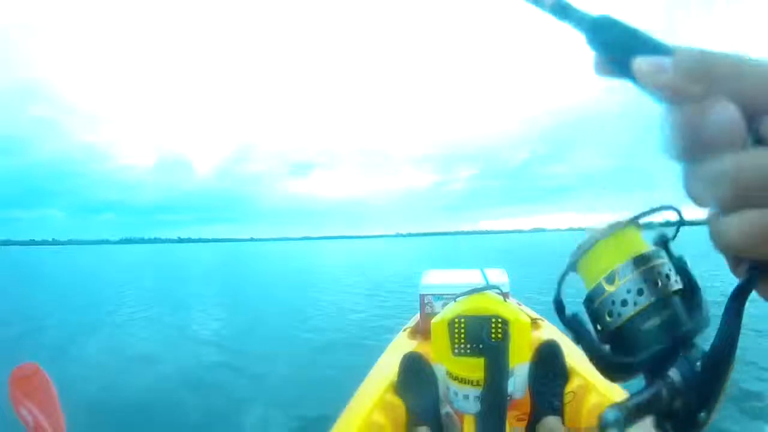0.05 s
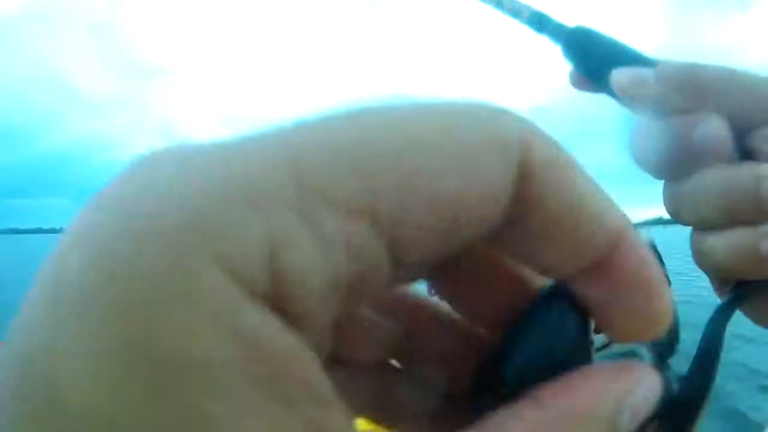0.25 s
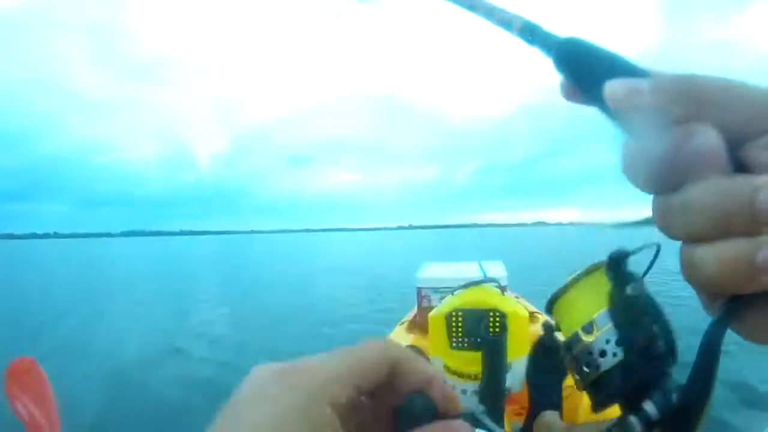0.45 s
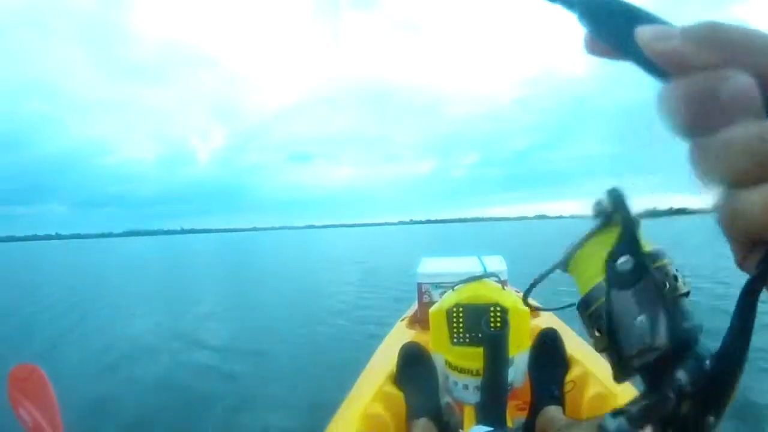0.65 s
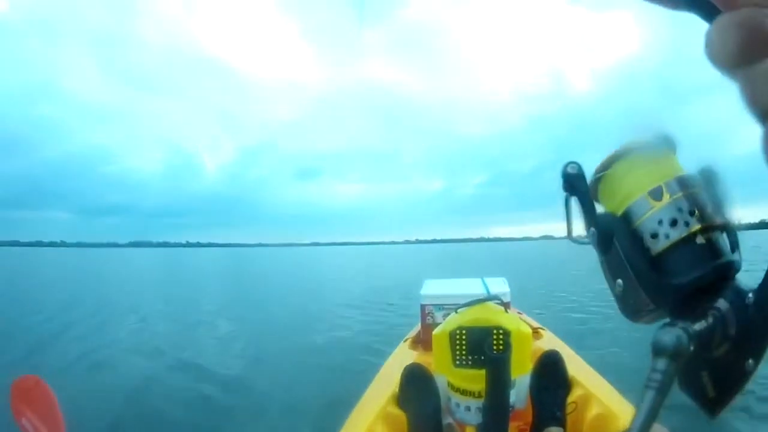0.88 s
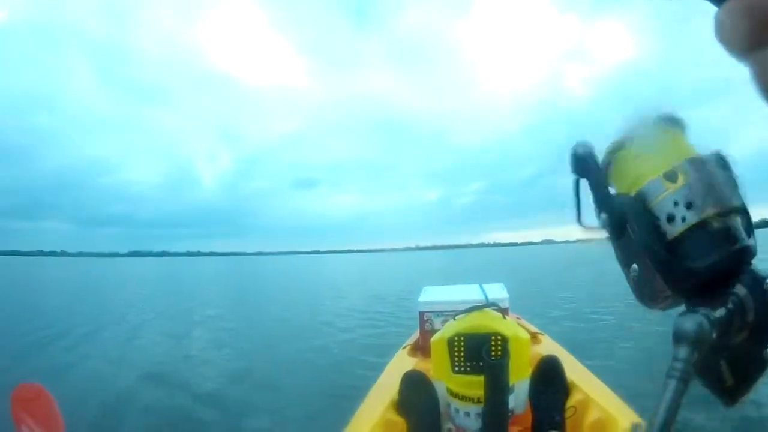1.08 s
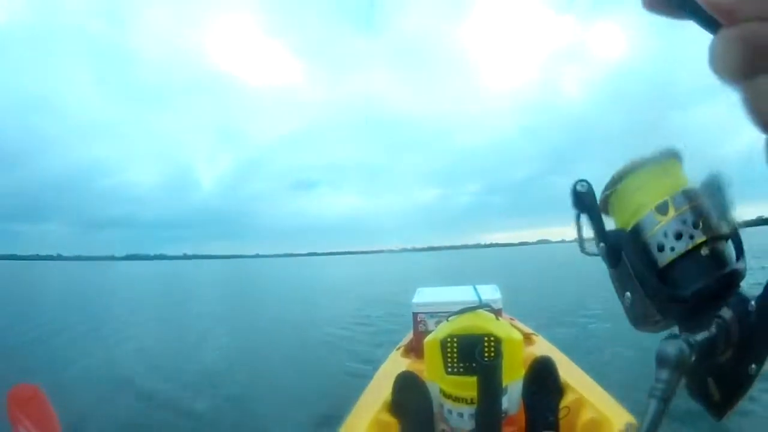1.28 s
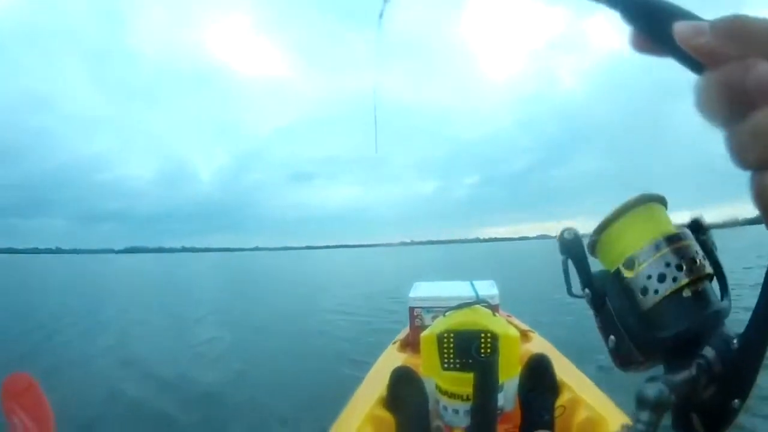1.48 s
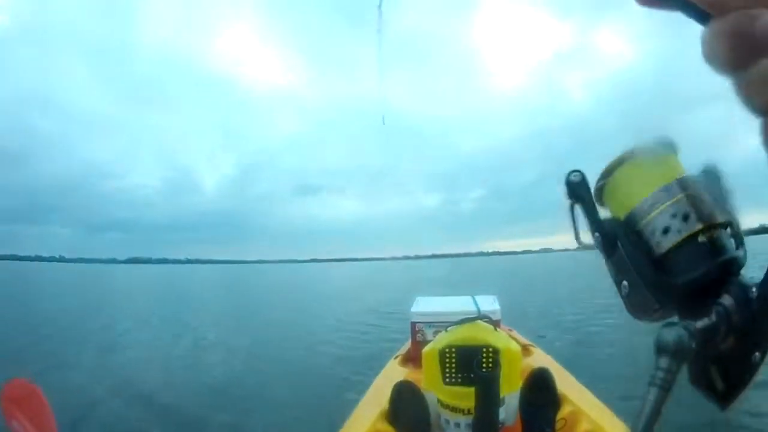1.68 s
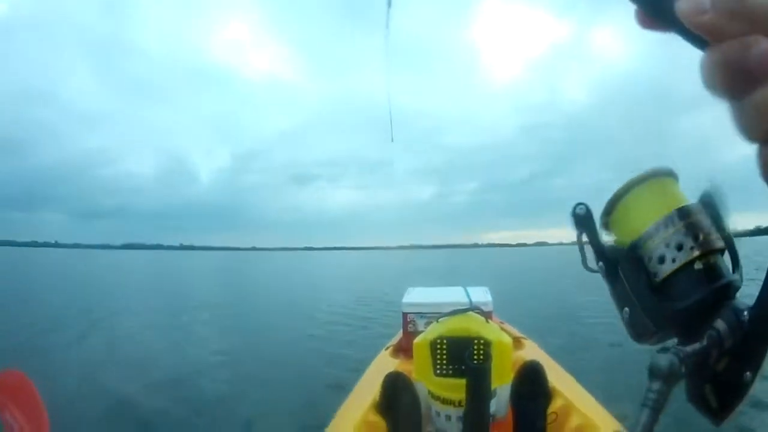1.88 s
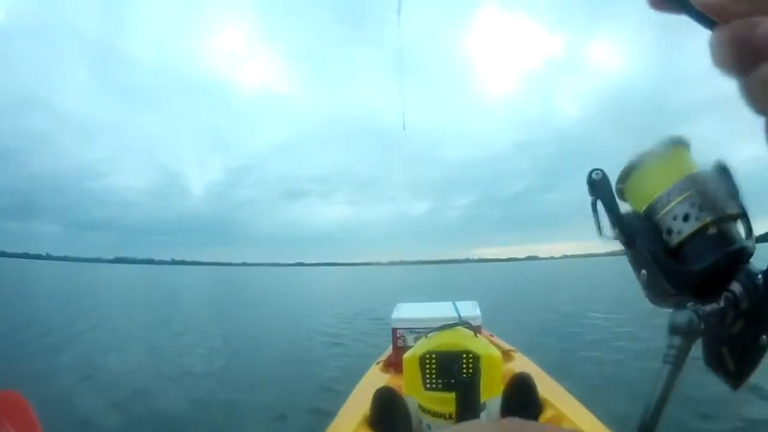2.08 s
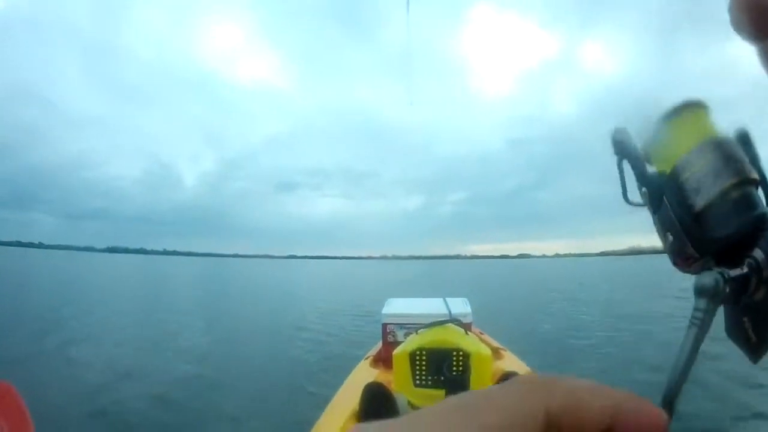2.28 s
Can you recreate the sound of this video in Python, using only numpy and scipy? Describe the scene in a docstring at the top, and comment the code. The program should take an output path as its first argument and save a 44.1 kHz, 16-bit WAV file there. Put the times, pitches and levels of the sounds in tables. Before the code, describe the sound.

A fishing reel whirs faintly after a hand bumps the microphone housing. Then its drag clicks into a rasping buzz as line pulls out, while gear knocks sharply three times. Close up, over a low rumble on open water.

```python
"""First a hand bumps and scrapes a small camera's plastic housing, on a fishing kayak in calm water.
The reel's gears whir faintly and the hull thuds softly, over a low rumble and the hiss of open air.
Then line is pulled off the spool: a small catch (the pawl) clicks on each passing tooth, speeding
up to a buzz, and the line rasps. Fishing gear knocks three times and makes the housing ring."""
import sys
import numpy as np
from scipy import signal
from scipy.fft import rfft, irfft, next_fast_len
from scipy.io import wavfile
from scipy.ndimage import uniform_filter1d, minimum_filter1d, map_coordinates

SR = 44100
rng = np.random.default_rng(int(sys.argv[2]) if len(sys.argv) > 2 else 0)


def file_out(sig):
    """Save sig as 16-bit WAV at sys.argv[1]."""
    # one column per channel
    cols = np.atleast_2d(sig).T
    # limit, then scale
    lim = np.clip(cols, -1, 1)
    pcm = np.round(lim * 32767).astype(np.int16)
    wavfile.write(sys.argv[1], SR, pcm)


N = 108045

# the tones the housing rings with: pitch_hz, level_db, fade_s (time to fall by 60 dB)
HOUSING_TONES = [(500, -24, 0.03), (776, -10, .022), (1091, 1.5, 0.026), (1334, -7, 0.023),
                 (1537, -5, 0.025), (1693, -9, 0.029), (2059, -6, 0.025), (2400, -24.5, 0.025),
                 (2775, -20.5, .014), (3643, -14, 0.018), (8370, -24.5, 0.025), (9980, -17.5, 0.025),
                 (10480, -19.5, 0.024), (10915, -16.5, 0.023), (12800, -18, 0.025), (13900, -16, 0.026)]
HOUSING_ATTACK_S = 0.0009


def reel_drag():
    """The pawl clicks once per tooth of the slipping spool; faster line rasps louder."""
    # how fast the spool turns: time_s, clicks_per_s
    spool_speed = [(1.558, 52), (1.58, 90), (1.61, 190), (1.64, 305), (1.71, 373.8), (1.81, 230),
                   (1.845, 125), (1.866, 84), (1.893, 64), (1.925, 125), (2.0, 230), (2.08, 335),
                   (2.13, 260), (2.2, 310), (2.38, 240), (2.45, 170)]
    # how hard the pawl strikes: time_s, level_db
    pawl_force = [(1.558, -35), (1.578, -36), (1.608, -60), (1.635, -29), (1.68, -33.5), (1.71, -34.5),
                  (1.775, -34), (1.81, -28.5), (1.825, -41), (1.86, -34), (1.885, -47), (1.9, -33.5),
                  (1.92, -34.5), (1.94, -37.5), (2.05, -33.5), (2.15, -37.5), (2.25, -35.5), (2.37, -37),
                  (2.45, -40)]
    # the tones the pawl rings with: pitch_hz, level_db, fade_s
    pawl_tones = [(4665, -0.5, 0.0093), (5470, -15, 0.011), (6520, -16.5, 0.0058), (7310, -3.5, 0.0089)]
    # the noisy snap in each click: pitch_hz, level_db
    snap_colour = [(2500, -43), (4300, 4), (7500, -0.5), (9000, -45)]
    # the rasp of running line: pitch_hz, level_db
    line_colour = [(500, -21), (850, -22), (1100, -9), (1400, -13.5), (1600, -9.5), (1780, 7.5),
                   (2050, -10.5), (2600, -8), (2950, -14.5), (3130, 1.5), (3450, -10), (3900, -5),
                   (4700, -8), (5500, -13), (6000, -40), (6500, -8.5), (7300, -16), (8100, -10.5),
                   (8900, -13), (9500, -20.5), (10200, -12), (11000, -53), (12900, -54), (13750, -11),
                   (14400, -31), (15150, -12.5), (15600, -58)]
    t, out, speed = clock(), np.zeros(N), curve(spool_speed)
    start_s, start_speed = spool_speed[0]
    slipping = t >= start_s
    teeth_passed = np.ceil(np.cumsum(speed * slipping) / SR)
    tug_db = 2.47 * wobble(45)
    force_db = curve(pawl_force) + tug_db
    for i in np.flatnonzero(np.diff(teeth_passed)):
        snap_db = -7 - 4.5 * np.log2(speed[i] / start_speed)  # softer as the spool speeds up
        snap = amp(snap_db) * burst(snap_colour, fade_s=0.0062, size=1024)
        click = ring(pawl_tones, attack_s=0.00099, scatter_db=2.5, size=1024) + snap
        click_s = t[i] + 0.0006 * rng.normal()
        click_db = force_db[i] + rng.normal()
        add(out, click_s, amp(click_db) * click)
    rasp = unit(amp(wobble(400)) * noise(line_colour))
    rasp_db = -47.5 + 4 * np.log2(speed / 372) + tug_db  # 4 dB louder at twice the speed
    return out + slipping * amp(rasp_db) * rasp


def gear_knocks():
    """Each knock rings the housing, rocks the camera's mount and bounces once."""
    # hard knocks: start_s, level_db, thump_db, bounce_after_s, bounce_db (relative to the knock)
    knocks = [(1.9512, -7, -14.5, .0120, -7.5), (2.0775, -14, -20, .0130, -11),
              (2.1760, -14.5, -17, 0.00431, -9)]
    out, thump_delay_s = np.zeros(N), 0.0036
    for start_s, level_db, thump_db, bounce_after_s, bounce_db in knocks:
        thump = ring([(141.7, thump_db, 0.024)], attack_s=0.00032)
        add(out, start_s, amp(level_db) * housing_hit())
        add(out, start_s + thump_delay_s, thump)
        add(out, start_s + bounce_after_s, amp(level_db + bounce_db) * housing_hit())
    return out


def housing_hit():
    """One hard hit on the plastic: ringing tones and a short low thud."""
    # the thud: pitch_hz, level_db
    thud_colour = [(200, 87), (500, -7), (1000, -12), (2200, -28), (3000, 48), (3700, -9), (4500, -19),
                   (7500, -41), (10500, -11), (11200, -29), (12000, -39), (13000, -13), (13800, -57),
                   (15000, -41)]
    ringing = ring(HOUSING_TONES, HOUSING_ATTACK_S, scatter_db=-0.44)
    return ringing + amp(-10.5) * burst(thud_colour, fade_s=0.033)


def hand_taps():
    """A soft touch gives a muffled ring, a short low push and a faint bright tick."""
    # taps on the housing: start_s, level_db, push_db, cutoff_hz, tick_db
    taps = [(0.21, -29, -28, 3040, -45), (0.2188, -28, -29, 4000, -41), (0.319, -44.5, -42, 3040, -60.5),
            (1.5067, -36.5, -24, 630, -60)]
    # the tick: pitch_hz, level_db
    tick_colour = [(7000, -36), (9500, -9), (11000, -4), (13500, -6), (15000, -16)]
    out = np.zeros(N)
    for start_s, level_db, push_db, cutoff_hz, tick_db in taps:
        muffle = signal.butter(2, cutoff_hz, fs=SR, output="sos")
        dull_ring = signal.sosfilt(muffle, housing_hit())
        push = ring([(212, push_db, 0.018)], attack_s=0.00024)
        tick = amp(tick_db) * burst(tick_colour, fade_s=0.041)
        add(out, start_s, amp(level_db) * dull_ring + push + tick)
    return out


def hand_scrape():
    """The hand rubs over the housing in tiny quick slips, and each slip makes it ring."""
    # the rubbing noise: pitch_hz, level_db
    rub_colour = [(180, -5), (300, -5), (541, -17.5), (714, -8), (991, -11), (1130, 2.5), (1440, -34),
                  (1700, -6), (2320, -18.5), (2780, -31.5), (3730, -13.5), (4180, -29), (4930, -27),
                  (6200, -41), (8190, -24), (9180, -44), (10600, -20), (12100, -53), (12700, -42),
                  (13600, -36), (15000, -61)]
    peak_s, rise_s, fall_s, slips_per_s = 0.2319, 0.0044, 0.01, 1560
    t = clock() - peak_s
    stroke = swell(t, np.where(t < 0, rise_s, fall_s))
    slips = (rng.random(N) < slips_per_s / SR) * rng.choice([-1, 1], N) * stroke
    ringing = signal.fftconvolve(slips, ring(HOUSING_TONES, HOUSING_ATTACK_S))[:N]
    ringing = unit(ringing) * np.sqrt(np.mean(stroke ** 2))  # as strong as the stroke
    rub = swell(t - 0.003, half_s=0.0097) * noise(rub_colour)
    return amp(-24) * ringing + amp(-24.5) * rub


def hull_thuds():
    """Dull thuds pass through hand, seat and hull: brief low swells that do not ring."""
    # thuds: peak_s, pitch_hz, level_db, half_length_s
    thuds = [(0.2256, 45, -5.5, 0.01), (.2205, 116, -13.5, 0.004), (.33, 148, -54.5, 0.019),
             (0.826, 80, -44.5, 0.017), (.965, 31, -36, 0.032), (1.321, 88, -46, .016),
             (1.642, 184, -40, 0.0054)]
    t = clock()
    return sum(amp(db) * swell(t - peak_s, half_s) * np.cos(2 * np.pi * hz * (t - peak_s))
               for peak_s, hz, db, half_s in thuds)


def reel_whir():
    """The reel's gears rub quietly, with a fine grain and a tone that keeps shifting."""
    # how loud the reel is as it is handled: time_s, level_db
    whir_level = [(.1, -62), (.2, -68.5), (.3, -61), (.45, -59.5), (.54, -61), (.59, -62.5), (.63, -59.5),
                  (.68, -58.5), (.745, -61), (.79, -92), (.83, -78), (.85, -61), (.88, -70.5), (1.12, -85),
                  (1.165, -65), (1.21, -87), (1.237, -62), (1.27, -80), (1.5, -69)]
    # the rubbing gears: pitch_hz, level_db
    whir_colour = [(600, -16.5), (800, -2), (950, -15.5), (1090, 2.5), (1350, -10), (1620, -4), (1800, 8),
                   (1950, -3), (2100, 4.5), (2320, -4), (2750, -13), (3700, -8), (4100, -12.5), (4550, -5),
                   (5100, -21), (5600, -15), (6000, -40), (6500, -23), (7400, -12), (8750, -19.5),
                   (10100, -11.5), (11600, -42), (14000, -12.5), (15000, -30)]
    grain_db, patch_db = 2.5, 4
    grainy = amp(grain_db * wobble(250)) * rng.standard_normal(N)
    spectrum = signal.stft(grainy, nperseg=512)[2]
    # random patches of pitch and time get louder or softer
    patches = uniform_filter1d(rng.standard_normal(spectrum.shape), size=4, axis=0)
    patches = uniform_filter1d(patches, size=9, axis=1)
    patchy = signal.istft(spectrum * amp(patch_db * unit(patches)), nperseg=512)[1][:N]
    return amp(curve(whir_level)) * coloured(patchy, whir_colour)


def water_and_air():
    """Water and hull rumble under the steady hiss of open air."""
    # how loud the rumble is: time_s, level_db
    rumble_level = [(.1, -59.5), (.3, -52), (.55, -50.5), (.75, -55), (1.05, -53.5), (1.45, -53.5),
                    (1.62, -50), (2.1, -47), (2.3, -49), (2.45, -58)]
    # the rumble: pitch_hz, level_db
    rumble_colour = [(20, 2), (45, -9), (100, -8.5), (240, -16.5), (320, -23), (600, -37), (1500, -63)]
    # the hiss: pitch_hz, level_db
    air_colour = [(300, 9), (600, 3), (2100, -5), (3000, -5.5), (5400, -11.5), (6000, -29), (6600, -12.5),
                  (10300, -16.5), (11200, -19.5), (13000, -29), (14000, -17), (14500, -39)]
    rumble = amp(curve(rumble_level) + wobble(23)) * noise(rumble_colour)
    return rumble + amp(-65.5) * noise(air_colour)


def amp(db):
    """Turn decibels into a number to multiply by."""
    return 10 ** (np.asarray(db) / 20)


def unit(x):
    """Scale a signal to an average strength (rms) of 1."""
    return x / np.sqrt(np.mean(x ** 2) + 1e-20)


def clock():
    """The time of every sample, in seconds."""
    return np.arange(N) / SR


def curve(rows):
    """Join (time_s, value) points with straight lines."""
    return np.interp(clock(), *np.transpose(rows))


def swell(t, half_s):
    """A smooth rise and fall that peaks at t = 0."""
    return np.exp(-(t / half_s) ** 2)


def wobble(points_per_s):
    """A smooth curve through random points."""
    return map_coordinates(rng.standard_normal(N // 8), [clock() * points_per_s + 2], mode="wrap")


def coloured(x, colour):
    """Give x a colour (how loud each pitch is), at strength 1."""
    size = next_fast_len(len(x) + 8192)
    hz, db = np.transpose(colour)
    gain = amp(np.interp(np.log(np.fft.rfftfreq(size, 1 / SR) + 1), np.log(hz + 1), db))
    return unit(irfft(rfft(x, size) * gain, size)[:len(x)])


def noise(colour, size=N):
    """Coloured noise of strength 1."""
    return coloured(rng.standard_normal(size), colour)


def burst(colour, fade_s, size=4096, attack_s=0.00039):
    """A puff of noise that dies away."""
    t = np.arange(size) / SR
    return amp(-60 * t / fade_s) * (1 - np.exp(-t / attack_s)) * noise(colour, size)


def ring(tones, attack_s, scatter_db=0, size=4096):
    """Tones that fade after one hit; neighbours start in opposite directions."""
    t, out = np.arange(size) / SR, np.zeros(size)
    for k, (pitch_hz, level_db, fade_s) in enumerate(tones):
        fade = amp(level_db + scatter_db * rng.normal() - 60 * t / fade_s)
        out += (-1) ** k * fade * np.sin(2 * np.pi * pitch_hz * t)
    return out * (1 - np.exp(-t / attack_s))


def add(track, start_s, sound):
    """Mix a sound into the track."""
    part = track[max(round(start_s * SR), 0):][:len(sound)]
    part += sound[:len(part)]


def scene():
    """Everything reaches one microphone, with no echo over open water."""
    bumps = gear_knocks() + hand_taps() + hand_scrape() + hull_thuds()
    return (bumps + reel_drag() + reel_whir() + water_and_air())[None]


def record(dry):
    """After a moment of silence, the camera turns down loud peaks and cuts the highest treble."""
    start_s, ceiling_db, top_hz = 0.102, -3.5, 15500
    needed_gain = np.minimum(1, amp(ceiling_db) / (np.abs(dry) + 1e-9))
    smooth_gain = uniform_filter1d(minimum_filter1d(needed_gain, size=90), size=90)
    limited = dry * smooth_gain * (clock() >= start_s)
    size = next_fast_len(N + 8192)
    below_top = np.fft.rfftfreq(size, 1 / SR) < top_hz
    return irfft(rfft(limited, size) * below_top, size)[:, :N]


dry = scene()
out = record(dry)
file_out(out)
```